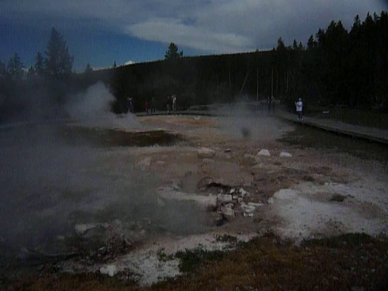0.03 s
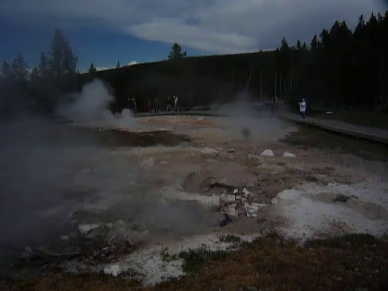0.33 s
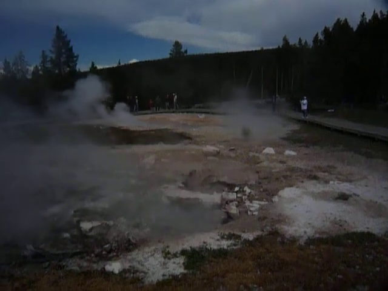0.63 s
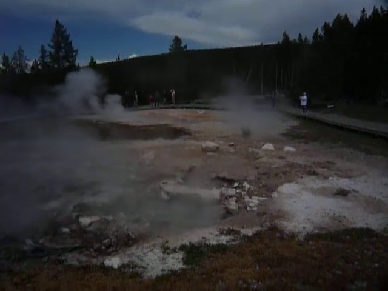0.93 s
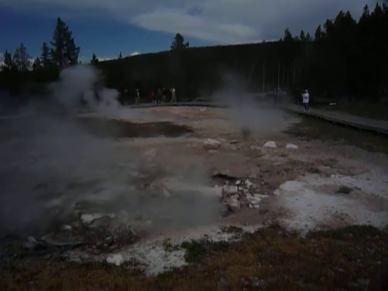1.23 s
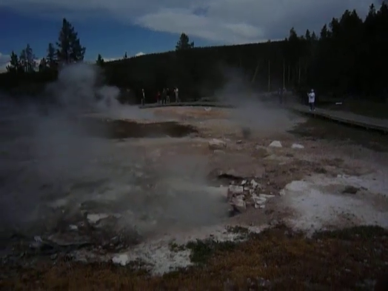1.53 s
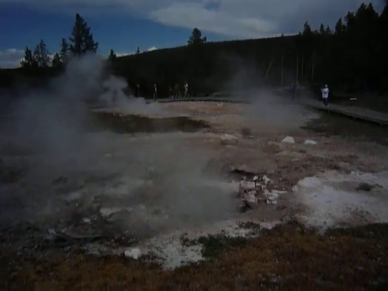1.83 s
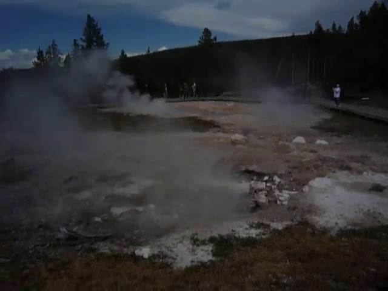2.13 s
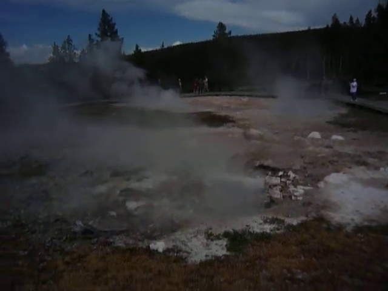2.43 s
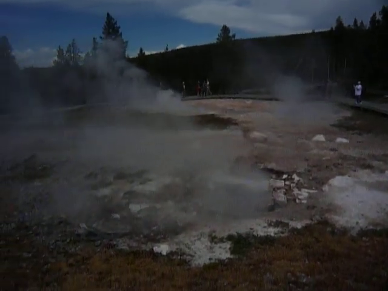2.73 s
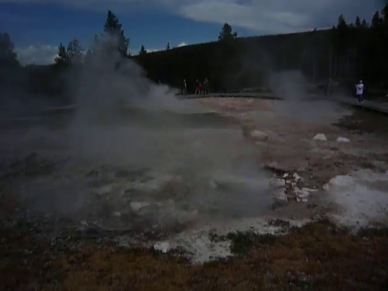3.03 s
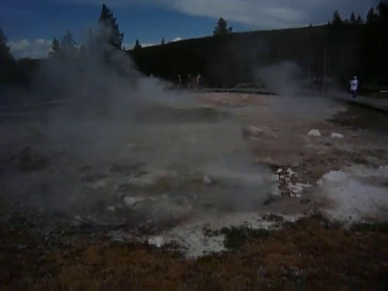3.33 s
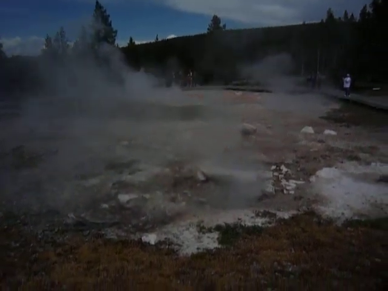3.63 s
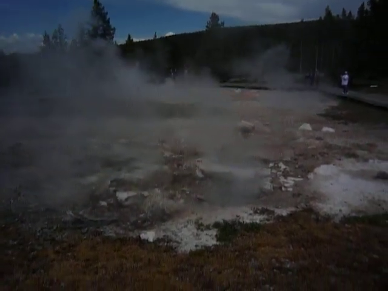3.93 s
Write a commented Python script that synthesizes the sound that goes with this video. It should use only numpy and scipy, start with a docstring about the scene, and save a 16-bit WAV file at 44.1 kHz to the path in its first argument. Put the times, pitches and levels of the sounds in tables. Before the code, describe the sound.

Rushing, hissing steam from gurgling ground vents, with a few soft wind bumps.

```python
"""Steam vents on an open geothermal field, heard through a small narrow-band camera microphone.
From the start a hollow roar throbs in the vent's throat, boiling water gurgles and spatters, and the
jet's whistling hiss swells and sinks, while a light wind gusts on the microphone.
The wind bumps it at 1.7 s and twice more near 2.7 s. Between 2.3 and 3.7 s the vent mouths catch
the flow and sing out in brief hoots, and the steam rushes on to the end."""
import sys
import numpy as np
from scipy import signal
from scipy.fft import rfft, irfft
from scipy.io import wavfile

SR = 44100
rng = np.random.default_rng(int(sys.argv[2]) if len(sys.argv) > 2 else 0)


def file_out(sig):
    """Save sig as 16-bit WAV at sys.argv[1]."""
    # one column per channel
    cols = np.atleast_2d(sig).T
    # limit, then scale
    lim = np.clip(cols, -1, 1)
    pcm = np.round(lim * 32767).astype(np.int16)
    wavfile.write(sys.argv[1], SR, pcm)


N = 176400


# How the vents surge. Each row: time in seconds, then low roar, upper roar and spray gains in dB.
SURGES = [(.1, 3.5, 3, -11), (0.401, 2.5, 2, -2.5), (.6, 3.5, 1.5, 2.5), (.8, 2, 0, 3), (.98, 4, 0.5, 2),
          (1.3, 3.5, -1.5, 2), (1.55, 2.5, 1.5, -10), (1.75, 1.5, -1.5, -2.5), (2.051, 3.5, 0, -0.5),
          (2.35, 2.5, 1, -1), (2.7, -1, .5, -0.5), (3.05, 2, -1, 2.5), (3.35, 0.5, -.5, 0),
          (3.6, 3, 0.5, 5.5), (4, 2, -1, 1.5)]

def steam():
    """All the voices of the vents, surging and sputtering together."""
    times, *gains = np.transpose(SURGES)
    low_db, upper_db, spray_db = (curve(np.c_[times, db]) for db in gains)
    voices = roar(low_db, upper_db) + drone() + hoots() + hiss() + boiling(upper_db, spray_db)
    sputter_db = 0.6 * flutter(rate_hz=17)
    return voices * amp(sputter_db)


# The tone of the rushing steam. Each row: frequency in Hz, relative level in dB.
ROAR_SPECTRUM = [(50, -47.5), (80, -19), (125, -7.5), (180, -4), (240, 2.5), (345, -2), (470, 0.5),
                 (580, -6), (720, -4.5), (850, -5.5), (1060, -8.5), (1140, -13), (1400, -13.5), (2200, -20),
                 (4000, -64)]
# The hollow ring of the vent mouths. Each row: pitch in Hz, width in Hz, level in dB.
MOUTH_RESONANCES = [(176, 29, -38.5), (426, 49, -40.5), (657, 58, -35), (778, 77, -32.5), (920, 64, -34),
                    (1037, 87, -32.5), (1218, 77, -41), (1587, 130, -47), (2340, 43, -50)]
ROAR_DB, SPLIT_HZ = -26.5, 600

def roar(low_db, upper_db):
    """A broad rush of steam rings the vent mouths; its lows and its upper part swell separately."""
    rush = amp(ROAR_DB) * turbulence(ROAR_SPECTRUM, patchy_db=-0.58, patch_s=0.13, patch_hz=350)
    body = rush + sum(amp(db) * ring(hz, width) for hz, width, db in MOUTH_RESONANCES)
    low = filtered(body, lambda f: 1 / (1 + (f / SPLIT_HZ) ** 8))
    return amp(low_db) * low + amp(upper_db) * (body - low)


# The throb of the main vent's throat. Each row: time in seconds, level in dB.
THROAT_SWELLS = [(.1, -32), (.45, -26), (.62, -29), (.98, -23), (1.35, -28.5), (1.8, -22.5), (2.1, -33),
                 (2.3, -26.5), (2.55, -29), (2.78, -25), (3.1, -29), (4, -31)]

def drone(pitch_hz=284.6, width_hz=52.5):
    """Steam keeps the throat humming in one narrow, beating band."""
    hum = shaped(lambda f: 1 / (1 + (2 * (f - pitch_hz) / width_hz) ** 10))
    return amp(curve(THROAT_SWELLS)) * hum


# Soft hoots. Each row: centre in seconds, half length in seconds, pitch in Hz, level in dB.
MOUTH_HOOTS = [(2.337, 0.049, 406, -26), (2.79, 0.051, 1058, -30.5), (3.0, 0.053, 772, -28.5),
               (3.005, 0.043, 1053, -29.5), (3.304, 0.038, 1080, -34), (3.703, .09, 1040, -32)]

def hoots():
    """A vent mouth catches the flow and briefly sings."""
    t, out = np.arange(N) / SR, np.zeros(N)
    for centre, half_length, hz, db in MOUTH_HOOTS:
        swell = np.exp(-((t - centre) / half_length) ** 2 / 2)
        out += amp(db) * swell * ring(hz, width_hz=30)
    return out


# The tone of the hiss. Each row: frequency in Hz, relative level in dB.
HISS_SPECTRUM = [(600, -12), (1250, -6), (1650, -9.5), (2100, -13.5), (2340, -2.5), (2490, -4.5),
                 (2680, 2.5), (3100, -1), (3400, -2.5), (3700, -2.5), (4000, -10), (4300, -22),
                 (4550, -44.5)]
# The push of the jet, riding hiss and whistles alike. Each row: time in seconds, level in dB.
JET_SWELLS = [(0.1, -38.5), (0.71, -36), (0.8, -38), (1.03, -35.5), (1.16, -37), (1.2, -32.5), (1.23, -38),
              (1.6, -40), (1.72, -42), (2.15, -39), (2.39, -36.5), (3.12, -37), (3.31, -39.5),
              (3.54, -35.5), (3.93, -39.5)]
# The wavering whistle. Each row: time in seconds, pitch in Hz, level in dB relative to the jet.
WHISTLE_PATH = [(.1, 2882, -2.5), (.35, 2938, -2.5), (.65, 2857, -5.5), (1.1, 2890, -7),
                (1.551, 2860, -0.5), (1.95, 2890, -3.5), (2.5, 2883, -3.5), (3.051, 2867, -1.5),
                (3.299, 2802, -2.5), (3.65, 2948, -3), (4, 2903, -1)]
HISS_DB, OVERBLOW_DB = -1.5, -11.5

def hiss():
    """The jet hisses, with a breathy, gliding whistle in it and a faint steady one above."""
    air = amp(HISS_DB) * turbulence(HISS_SPECTRUM, patchy_db=0.84, patch_s=0.082, patch_hz=500)
    times, hz, db = np.transpose(WHISTLE_PATH)
    pitch, whistle_db = curve(np.c_[times, hz]), curve(np.c_[times, db])
    # Slide a narrow band of noise along the pitch curve.
    glide = np.exp(2j * np.pi * np.cumsum(pitch - pitch.mean()) / SR)
    whistle = (signal.hilbert(ring(pitch.mean(), width_hz=170)) * glide).real
    overblow = amp(OVERBLOW_DB) * ring(hz=3383, width_hz=170)
    return amp(curve(JET_SWELLS)) * (air + amp(whistle_db) * whistle + overblow)


GURGLE_DB, SPATTER_DB = -35, -38.5

def boiling(upper_db, spray_db):
    """Bubbles burst in the vent, swelling with the upper roar, and fine spray lands round it."""
    gurgle = grains(per_s=450, low_hz=391, high_hz=1141, cycles=8, spread_db=2.0)
    spatter = grains(per_s=1500, low_hz=1130, high_hz=2183, cycles=10, spread_db=1.8)
    return amp(GURGLE_DB + upper_db) * gurgle + amp(SPATTER_DB + spray_db) * spatter


# The dull tone of the gusts. Each row: frequency in Hz, relative level in dB.
GUST_SPECTRUM = [(15, -15.5), (35, -16), (60, -2), (85, 0.5), (130, 6.5), (200, 6.5), (400, -31.5),
                 (1000, -58.5)]
# Their rise and fall. Each row: time in seconds, level in dB.
GUST_SWELLS = [(.1, -32.5), (.3, -40), (.55, -38), (.85, -30.5), (1.05, -48), (1.25, -35), (1.42, -41.5),
               (1.72, -33), (1.93, -35.5), (2.03, -46), (2.15, -39), (2.5, -39), (2.72, -31.5),
               (2.9, -31.5), (3.1, -30.5), (3.4, -40.5), (3.7, -45), (3.83, -37), (4, -36)]
# Low wind thumps. Each row: centre in seconds, pitch in Hz, level in dB, half length in cycles.
WIND_BUMPS = [(1.691, 150, -11.7, .5), (2.645, 232, -14.5, 1.1), (2.7345, 90, -18.5, .5)]
LOW_FLOOR_HZ, LOW_FLOOR_DB = 55, -58

def wind():
    """Wind gusts and a few bumps on the microphone, over a faint, steady low noise floor."""
    gusts = amp(curve(GUST_SWELLS)) * shaped(lambda f: colour(GUST_SPECTRUM, f))
    low_floor = amp(LOW_FLOOR_DB) * shaped(lambda f: 1 / (1 + (f / LOW_FLOOR_HZ) ** 4))
    out = gusts + low_floor
    for centre, hz, db, cycles in WIND_BUMPS:
        turns = (np.arange(N) / SR - centre) * hz
        out -= amp(db) * np.sin(2 * np.pi * turns) * np.exp(-(turns / cycles) ** 2 / 2)
    return out


def turbulence(spectrum, patchy_db, patch_s, patch_hz, hop=128):
    """Coloured noise whose level drifts in patches of time and frequency."""
    frames = dict(nperseg=4 * hop, noverlap=3 * hop)
    hz, t, cells = signal.stft(rng.standard_normal(N), SR, **frames)
    along_time = np.fft.fftfreq(len(t), hop / SR)
    along_pitch = np.fft.fftfreq(len(hz), hz[1])[:, None]
    blur = np.exp(-(along_time * patch_s * 2) ** 2 - (along_pitch * patch_hz * 2) ** 2)
    patches = unit(np.fft.ifft2(np.fft.fft2(rng.standard_normal(cells.shape)) * blur).real)
    noise = signal.istft(cells * amp(patchy_db * patches), **frames)[1][:N]
    return unit(filtered(noise, lambda f: colour(spectrum, f)))


def grains(per_s, low_hz, high_hz, cycles, spread_db, count=24):
    """Randomly timed damped rings of many pitches and sizes."""
    t, out = np.arange(2048) / SR, np.zeros(N)
    for hz in np.geomspace(low_hz, high_hz, count):
        sizes = amp(spread_db * np.minimum(rng.exponential(1, N), np.pi))
        signs = np.sign(rng.standard_normal(N))
        onsets = rng.random(N) < per_s / count / SR
        age = t * hz / cycles
        grain = np.sin(2 * np.pi * hz * t) * np.exp(-2 * age) * (1 - np.exp(-20 * age))
        out += signal.oaconvolve(sizes * signs * onsets, grain)[:N]
    return unit(out)


def ring(hz, width_hz):
    """Turbulence ringing in one resonance."""
    return shaped(lambda f: 1 / (1 + (2 * (f - hz) / width_hz) ** 2 / 2))


def flutter(rate_hz):
    """Random wandering up to about the given rate."""
    return shaped(lambda f: f / (f + 2) / (1 + (f / rate_hz) ** 4))


def shaped(gain):
    """Noise coloured by a gain curve, rms 1."""
    return unit(filtered(rng.standard_normal(N), gain))


def filtered(x, gain):
    """Applies a gain at each frequency."""
    return irfft(rfft(x) * gain(np.fft.rfftfreq(N, 1 / SR)), N)


def colour(points, hz):
    """Gain from a dB spectrum, read on a log-frequency axis."""
    f, db = np.transpose(points)
    return amp(np.interp(np.log(hz + 1), np.log(f), db))


def curve(points):
    """A control curve at every sample."""
    return np.interp(np.arange(N) / SR, *np.transpose(points))


def amp(db):
    """Decibels to gain."""
    return 10 ** (np.asarray(db) / 20)


def unit(x):
    """Scales to rms 1."""
    return x / np.sqrt(np.mean(x ** 2) + 1e-20)


def scene():
    """Steam in front and an independent wind beneath it, in mono."""
    return (steam() + wind())[None]


OPEN_S, CUTOFF_HZ = .072, 4560

def record(dry):
    """The microphone opens just after the start and cuts the treble steeply."""
    live = dry * (np.arange(N) / SR >= OPEN_S)
    lowpass = signal.firwin(511, CUTOFF_HZ, window=("kaiser", 9), fs=SR)
    return signal.oaconvolve(live, lowpass[None], "same")


dry = scene()
out = record(dry)
file_out(out)
```